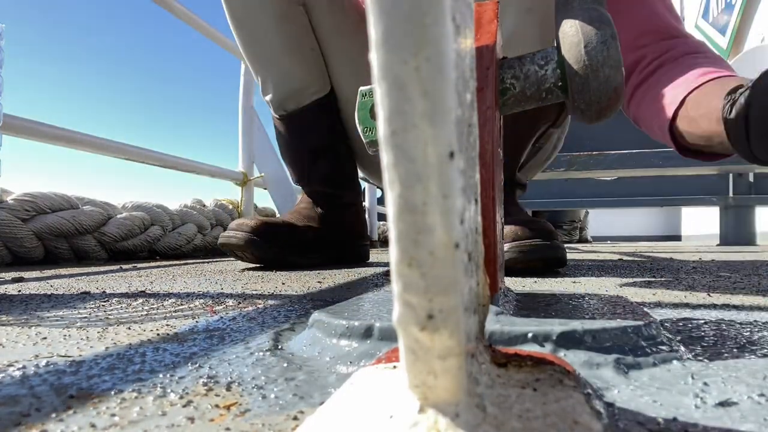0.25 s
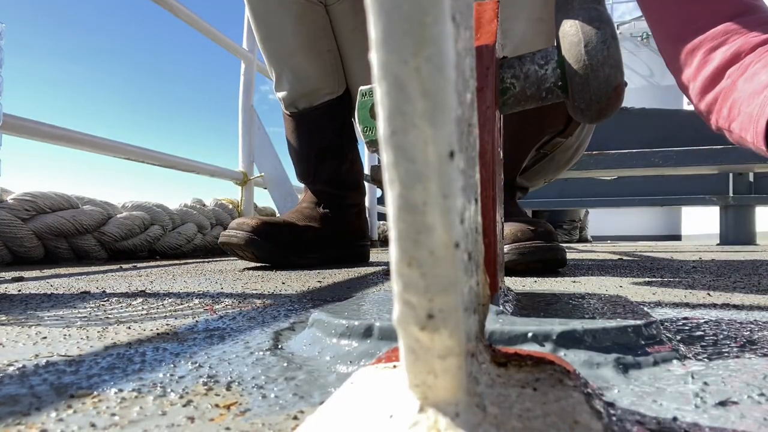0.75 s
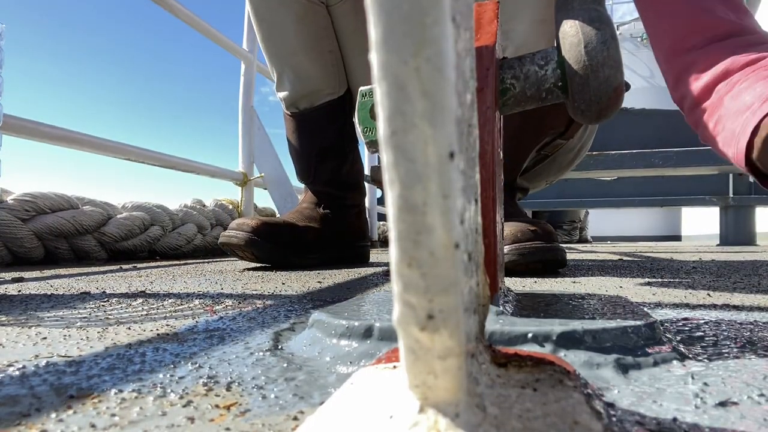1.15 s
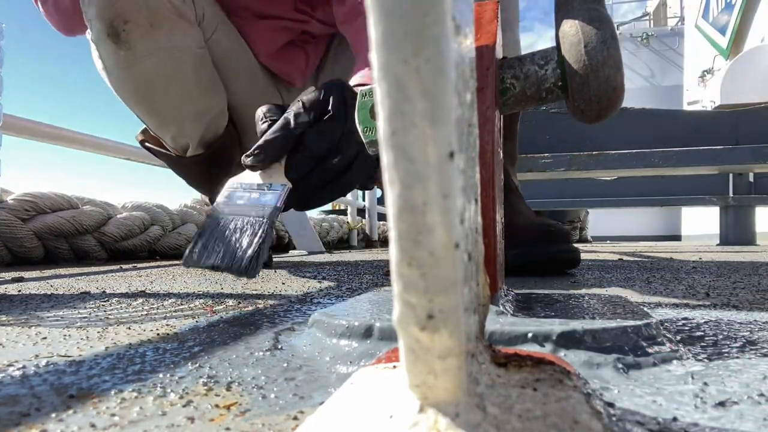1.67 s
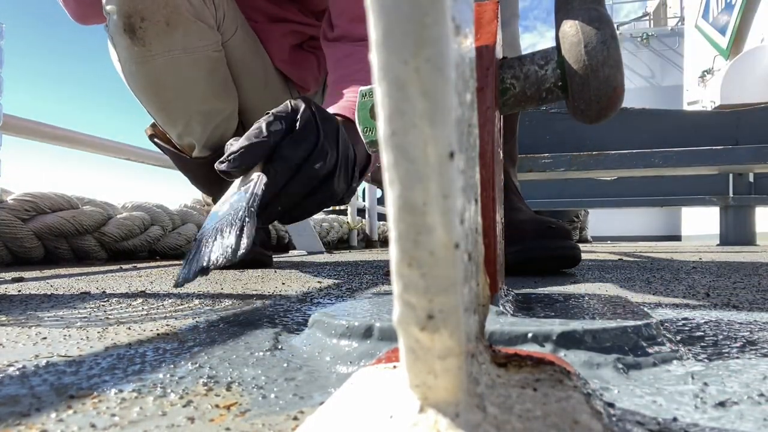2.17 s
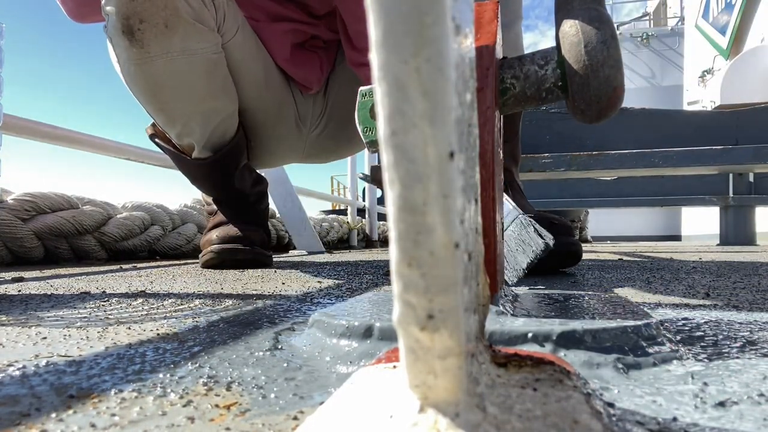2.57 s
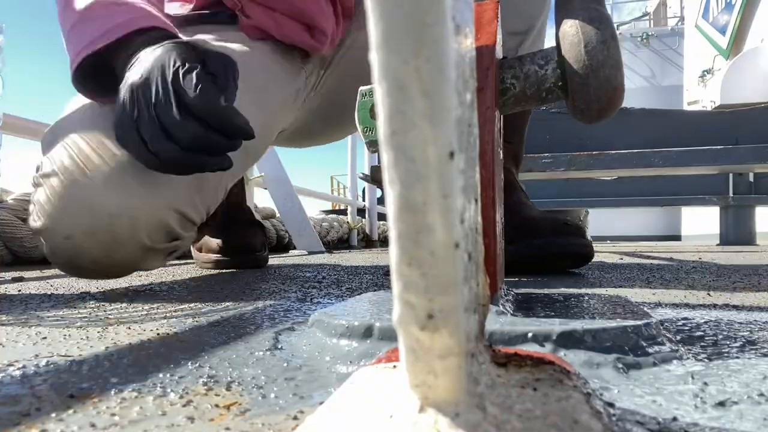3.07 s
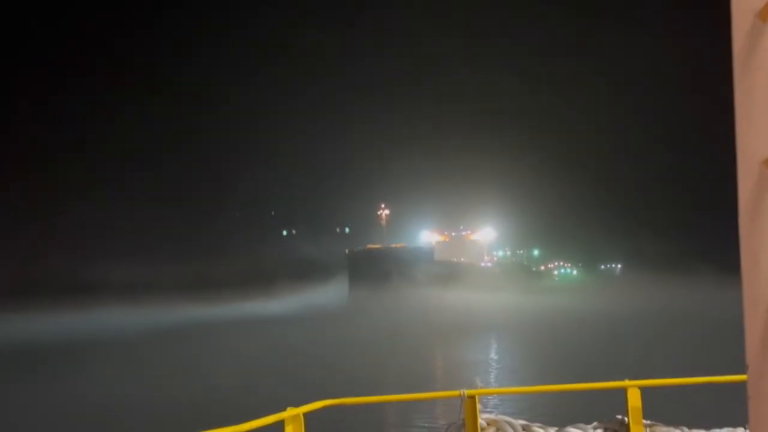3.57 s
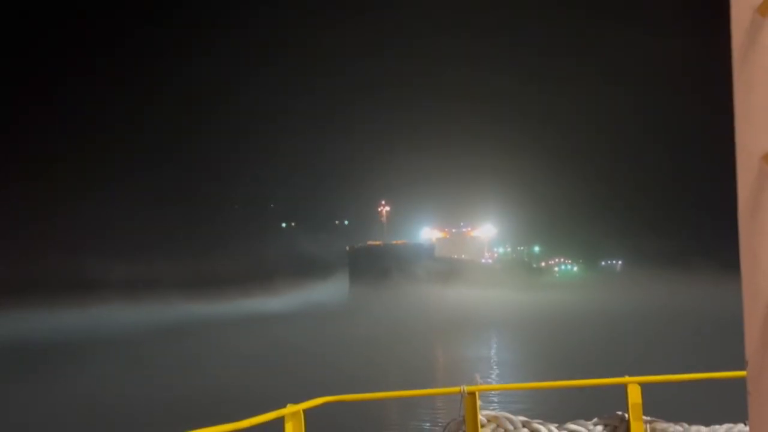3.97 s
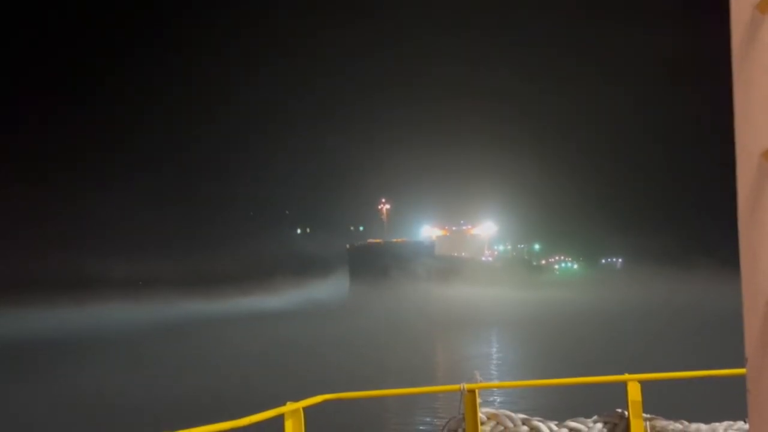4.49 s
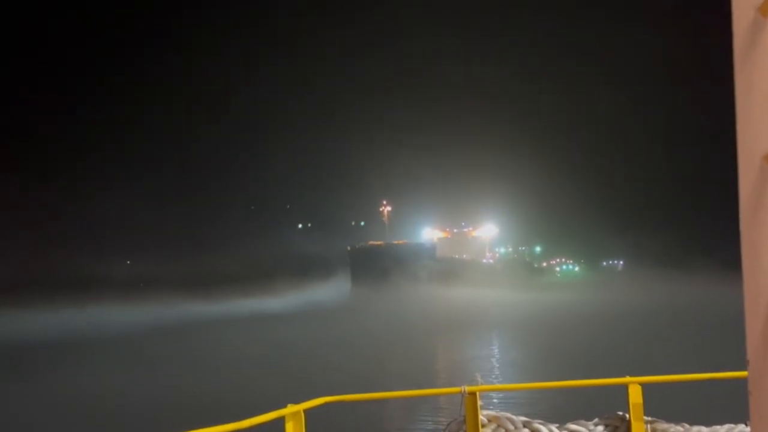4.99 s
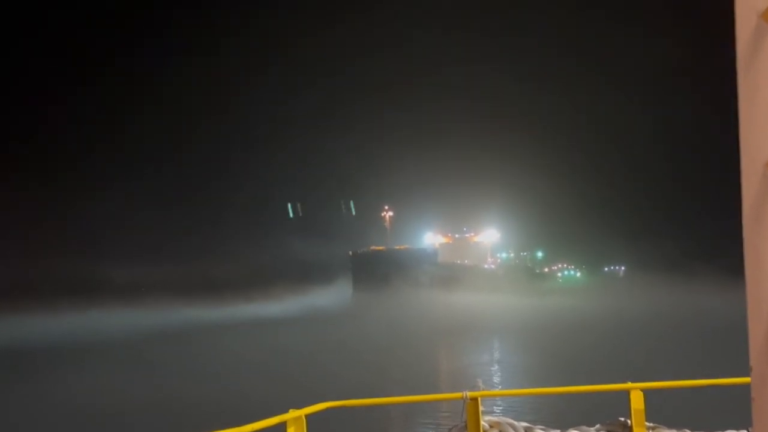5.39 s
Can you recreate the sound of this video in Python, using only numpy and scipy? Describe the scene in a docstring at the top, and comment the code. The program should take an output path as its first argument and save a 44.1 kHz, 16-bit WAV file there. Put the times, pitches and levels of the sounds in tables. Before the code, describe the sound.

A loud, steady rush of air and a constant mid-pitched motor hum come from a ventilation fan on a ship's deck, while wind knocks and crackles against the microphone. After about three seconds the sound switches abruptly to a calm river at night. There a faraway diesel engine drones, deep and gently pulsing, over a low rumble, far quieter than the fan.

```python
"""A ship's deck by day, then a quiet river at night. On deck a ventilation fan roars through its casing,
its motor sings on harmonics of the mains and its rotor whines. Wind buffets the two microphone ports,
and the hardest gusts make the gain control duck the machine. A hard cut leads to the river,
where a far diesel throbs over low rumble and a faint electrical whine."""
import sys
import numpy as np
from scipy import signal
from scipy.fft import rfft, irfft
from scipy.io import wavfile
from scipy.ndimage import uniform_filter1d

SR = 44100
rng = np.random.default_rng(int(sys.argv[2]) if len(sys.argv) > 2 else 0)


def dump_mix(stems):
    """Bounce the given channels to the path in sys.argv[1] as a 16-bit WAV at rate SR."""
    frames = np.atleast_2d(stems).T  # one column per channel
    limited = np.clip(frames, -1, 1)  # hard clip at full scale
    pcm = np.round(limited * 32767).astype(np.int16)
    wavfile.write(sys.argv[1], SR, pcm)


N = 248724
CUT_S = 3.2728   # from deck to river

# The rise and fall of the wind. Each row: time in seconds, strength in dB.
WIND_STRENGTH = [(0, -44.5), (.4, -45), (.75, -34.5), (1.0, -38.5), (1.4, -32), (1.8, -34), (2.0, -47),
                 (2.25, -34), (2.65, -39.5), (2.85, -32.5), (3.25, -39.5)]


def from_db(db):
    """Decibels to amplitude."""
    return 10 ** (np.asarray(db) / 20)


def bins_hz():
    """Frequencies of the spectrum bins, nudged off zero."""
    return np.arange(N // 2 + 1) * SR / N + 1e-3


def at_hz(rows, hz):
    """Every column of a spectrum table, read on a log-frequency axis."""
    row_hz, *columns = np.transpose(rows)
    return [np.interp(np.log(hz), np.log(row_hz), column) for column in columns]


def drift(rate_hz):
    """A random wander with a spread of 1, mostly slower than rate_hz."""
    hop, settle = 40, 2000
    pole = np.exp(-2 * np.pi * rate_hz * hop / SR)
    noise = rng.standard_normal(N // hop + settle + 2)
    slow = signal.lfilter([1], [1, -2 * pole, pole * pole], noise)[settle:]
    return np.interp(np.arange(N) / hop, np.arange(len(slow)), slow / slow.std())


def noise_field(spectrum, low_swell_db, high_swell_db, split_hz, swell_hz):
    """Stereo noise: a wave common to both ports plus a diffuse part; lows and highs swell separately."""
    db, pan_db, alike, lead = at_hz(spectrum, bins_hz())
    alike = np.clip(alike, 0, 1)
    common, left, right = rfft(rng.standard_normal((3, N)))
    ports = np.array([np.sqrt(alike) * common * np.exp(1j * lead) + np.sqrt(1 - alike) * left,
                      np.sqrt(alike) * common + np.sqrt(1 - alike) * right])
    ports *= np.sqrt(SR / 2) * from_db([db + pan_db / 2, db - pan_db / 2])
    lows = 1 / (1 + (bins_hz() / split_hz) ** 2)
    return (irfft(ports * lows, N) * from_db(low_swell_db * drift(swell_hz))
            + irfft(ports * (1 - lows), N) * from_db(high_swell_db * drift(swell_hz)))


def fan():
    """A broad roar of air, coloured by the casing; the hiss above 10 kHz slowly grows."""
    # The bare roar. Each row: frequency in Hz, level in dB per Hz, left minus right in dB,
    # share of power common to both ports, left phase lead in radians.
    airflow = [(60, -91, -0.5, 1, 0.5), (174, -89.5, -0.5, 0.99, -0.5), (377, -63.5, -1.5, 0.94, 0.5),
               (534, -54, -3.5, 0.98, 0.26), (834, -56, -2.5, 0.93, 0), (1376, -69.5, 0, 0.89, 0.5),
               (1940, -69, -3.5, 0.43, -1.0), (2520, -67, -5.5, 0.71, -0.5), (3870, -73, 1, 0.7, -1.5),
               (4620, -76, 0.5, 0.56, -2), (5290, -80.5, -2.5, 1, -4), (6490, -79.5, 4, 0.96, -3),
               (7030, -84, -1, 1, -3), (8330, -80.5, -1.2, 0.68, -3), (9670, -82.5, -4, 0.34, -2.5),
               (10000, -85, 0.5, 0.5, -2.5), (10170, -85, 0.5, 1, -3), (12200, -93.5, 0, 0.96, -3),
               (12600, -93, 0, .6, -4.5), (14000, -93.5, 1, .6, -2.5), (15500, -91.5, 0.5, .45, -4.5)]
    # The casing's humps and dips. Each row: centre in Hz, width in Hz, gain in dB.
    casing = [(1673, 40, 4), (2370, 75, 2.5), (2760, 140, -3.5), (3540, 160, 5.5), (6600, 790, 2),
              (14370, 350, 8.5), (15100, 300, -5)]
    casing_db = sum(db / (1 + (2 * (bins_hz() - hz) / width) ** 2) for hz, width, db in casing)
    air = noise_field(airflow, low_swell_db=0.25, high_swell_db=1.12, split_hz=1200, swell_hz=15.0)
    roar = rfft(air) * from_db(casing_db)
    hiss = irfft(roar / (1 + (10000 / bins_hz()) ** 6), N)
    lift_db = 0.7 + 1.3 * np.arange(N) / SR
    return irfft(roar, N) + (from_db(lift_db) - 1) * hiss


def motor_tones(rows, waver_db):
    """Sines of steady pitch and wavering level that reach the two ports out of step."""
    # Phase between the ports. Each row: frequency in Hz, left lead in radians.
    port_phase = [(700, -.14), (1100, -.06), (1800, -.1), (2600, -.9), (4400, -1.75), (5200, -3.1),
                  (8000, -3.2), (9100, -2.7), (10500, -3.1)]
    t = np.arange(round((CUT_S + .01) * SR)) / SR
    tones = np.zeros((2, N))
    swells = [from_db(waver_db * drift(5.1))[:len(t)] for _ in range(4)]
    for k, (hz, db, pan_db) in enumerate(rows):
        phase = 2 * np.pi * (hz * t + rng.random())
        lead = at_hz(port_phase, hz)[0]
        tones[0, :len(t)] += from_db(db + pan_db / 2) * np.sin(phase + lead) * swells[k % 4]
        tones[1, :len(t)] += from_db(db - pan_db / 2) * np.sin(phase) * swells[k % 4]
    return np.sqrt(2) * tones


def motor(pull_hz=119.905):
    """Magnetic pull hums at twice the mains frequency; the rotor adds its own, less steady whine."""
    # Magnetic hum. Each row: multiple of the pull rate, level in dB, left minus right in dB.
    harmonics = [(3.0, -45.1, -3.2), (6.0, -20.7, -3.7), (7.0, -38.0, -3.4), (8.0, -42.3, -3.6),
                 (9.0, -39.5, -2.7), (10.0, -44.7, -1.8), (11.0, -50.4, -3.5), (12.0, -45.0, -0.3),
                 (15.0, -51.2, 1.9), (16.0, -57, -2), (21.0, -54.2, -7.4), (24.0, -52.6, -0.4),
                 (27.0, -56.0, -3.2), (28.0, -60.1, 6.1), (29.0, -52.2, 0.7), (32.0, -60, 0),
                 (33.0, -59.0, 1.5), (36.0, -66.0, 4.0), (38.0, -65.0, 0.7), (46.0, -63, 0)]
    # Rotor and bearing whine. Each row: frequency in Hz, level in dB, left minus right in dB.
    whine = [(828.1, -35.3, -3.4), (1270.1, -52.9, -4.2), (1656.9, -56, -3), (2484.8, -52.0, -5.0),
             (2640.9, -48.9, -0.7), (2759.2, -54.0, -4.0), (2788.1, -51.3, -5.7), (2825.6, -51.8, 1.5),
             (2996.1, -55.4, -6.1), (4140.7, -56.3, 0.3), (4272.5, -52.8, 1.2), (4392.9, -52.4, -5.0),
             (5101.2, -63, 0), (5221.6, -63, 0), (6441.9, -64, 0), (6630.4, -61.9, -0.1),
             (7033.7, -61.9, -0.0), (7150.1, -63, 0), (7389.1, -64, 0), (7270.5, -49.7, 0.1),
             (7453.2, -56.5, -0.8), (7571.5, -61.7, -2.1), (8282.0, -55.4, -2), (8430.3, -62.5, -1),
             (9109.7, -60.3, -2.7), (10770, -65, 0), (10890, -66.5, 0)]
    hum = [(multiple * pull_hz, db, pan_db) for multiple, db, pan_db in harmonics]
    return motor_tones(hum, waver_db=0.76) + motor_tones(whine, waver_db=1.0)


def small_buffets(count):
    """Lesser buffets at random times, sized by the wind; same columns as the strong ones."""
    over_wind_db, edge_offset_db, pop_offset_db, spread_db = 4, -9, -25.5, 2.5
    times = rng.uniform(.06, CUT_S, count)
    scatter_db = spread_db * rng.uniform(-np.sqrt(3), np.sqrt(3), (count, 4)).T
    body_db = np.interp(times, *np.transpose(WIND_STRENGTH)) + over_wind_db + scatter_db[0]
    edge_db = body_db + edge_offset_db + scatter_db[1]
    pop_db = body_db + pop_offset_db + scatter_db[2]
    return np.transpose([times, body_db, edge_db, pop_db, 2 * scatter_db[3]])


def bursts(times, levels_db, pans_db, fall_s):
    """A stereo envelope of sharp peaks, each rising about as fast as it falls."""
    t, envelope = np.arange(N) / SR, np.zeros((2, N))
    for peak_s, db, pan_db in zip(times, levels_db, pans_db):
        near = slice(round((peak_s - .05) * SR), round((peak_s + .08) * SR))
        age = (t[near] - peak_s) / fall_s
        shape = np.exp(np.where(age < 0, age / 1.05, -age))
        envelope[:, near] += from_db([[db + pan_db / 2], [db - pan_db / 2]]) * shape
    return envelope


def coloured(sound, colour):
    """The sound through an EQ curve scaled to an rms gain of 1."""
    gain = from_db(at_hz(colour, bins_hz())[0])
    return irfft(rfft(sound) * gain / np.sqrt(np.mean(gain ** 2)), N)


def eddies(envelope, colour, alike):
    """Turbulent noise under an envelope; alike is the share of power common to both ports."""
    common, *own = rng.standard_normal((3, N))
    noise = np.sqrt(alike) * common + np.sqrt(1 - alike) * np.array(own)
    return coloured(envelope * noise, colour)


def pressure_jumps(times, levels_db, pans_db, fall_s, colour):
    """One coloured impulse per buffet, as strong as a burst of that fall time."""
    clicks = np.zeros((2, N))
    levels = from_db([levels_db + pans_db / 2, levels_db - pans_db / 2])
    clicks[:, (times * SR).astype(int)] = levels * np.sqrt(fall_s * SR)
    return coloured(clicks, colour)


def wind():
    """Wind on the ports: a lumpy bed, and buffets made of a body, a brighter edge and a deep pop."""
    # The strongest buffets. Each row: time in seconds, body in dB before its rush and thump trims,
    # edge in dB, pop in dB, left minus right in dB.
    strong_buffets = [(0.412, -27, -40.5, -51, 1), (0.672, -25, -36, -51, -7),
                      (0.712, -27.5, -34, -58.5, 2), (0.948, -26.5, -39.5, -49, -4.5),
                      (1.19, -22.5, -36, -65, -4), (1.344, -16.5, -24.5, -41, -1),
                      (1.445, -23, -27.5, -41.5, 0), (1.46, -22, -29, -53, -1), (1.476, -20, -30.5, -57, 0),
                      (1.519, -27.5, -35, -48.5, -1.5), (1.562, -25, -36, -52.5, -5.5),
                      (1.668, -20.5, -36, -43.5, -8), (1.69, -20.5, -22.5, -53.5, -6.5),
                      (1.787, -25, -30.5, -49.5, -2), (1.863, -22, -23, -53, 3.5),
                      (1.884, -21.5, -35.5, -58, -0.5), (2.193, -21, -32.5, -56.5, -1.5),
                      (2.223, -23, -27, -53.5, -2.5), (2.287, -22, -34.5, -60, -1),
                      (2.43, -23.5, -33, -58, -2), (2.556, -21.5, -28, -60, -5), (2.583, -19, -33, -58, -1),
                      (2.688, -28.5, -36, -50.5, 0), (2.75, -23.5, -27, -50, -4),
                      (2.765, -24, -33, -51.5, -0.5), (2.797, -24, -28, -49, -4.5),
                      (2.811, -21.5, -29, -54, -1), (2.828, -22, -29, -49.5, -2),
                      (2.9, -20.5, -27, -51.5, 0), (2.96, -27.5, -36, -51.5, -2),
                      (3.006, -22.5, -36, -61, -2), (3.148, -26.5, -33.5, -52.5, -5.5),
                      (3.255, -25.5, -37, -49, 0)]
    # Three wind colours behind the microphone's wind filter. Each row: frequency in Hz, relative dB.
    body_colour = [(30, -60), (150, -34), (250, -12), (400, 0), (600, 3.5), (1200, -13), (2500, -35),
                   (5000, -51.5), (9000, -83)]
    edge_colour = [(250, -63.5), (500, -18), (900, 3.5), (1500, 0), (2500, -7), (3500, -12), (5500, -27),
                   (9000, -59)]
    pop_colour = [(25, -1), (90, -3), (200, 3.5), (500, -21), (1000, -69)]
    body_fall_s, edge_fall_s, pop_fall_s, pop_lead_s = 0.0065, 0.0033, 0.0029, 0.003
    rush_trim_db, thump_trim_db = -2, -5   # the body is a rush of noise around one thump
    strength_db = np.interp(np.arange(N) / SR, *np.transpose(WIND_STRENGTH))
    lumps_db = 2.6 * np.array([drift(22), drift(24)])
    times, body_db, edge_db, pop_db, pan_db = np.vstack([strong_buffets, small_buffets(count=30)]).T
    bed = eddies(from_db(strength_db + lumps_db), body_colour, alike=0.55)
    rush = eddies(bursts(times, body_db + rush_trim_db, pan_db, body_fall_s), body_colour, alike=0.18)
    edge = eddies(bursts(times, edge_db, pan_db, edge_fall_s), edge_colour, alike=0.18)
    thump = pressure_jumps(times, body_db + thump_trim_db, pan_db, body_fall_s, body_colour)
    pop = pressure_jumps(times - pop_lead_s, pop_db, pan_db, pop_fall_s, pop_colour)
    return bed + rush + edge + thump + pop


def ducked(machine, gusts, half_power_db=-21, smooth_s=0.008):
    """Strong wind at the ports makes the gain control turn the machine down for a moment."""
    wind_power = uniform_filter1d(np.mean(gusts ** 2, axis=0), round(smooth_s * SR))
    return machine / np.sqrt(1 + (wind_power / from_db(half_power_db) ** 2) ** 2)


def treble_shift(machine, at_s=1.5, fade_s=0.087):
    """The treble in the centre of the image changes colour; the sides stay as they are."""
    # The centre's EQ. Each row: frequency in Hz, gain in dB after the shift (the opposite before it).
    treble_eq = [(5600, 0), (6200, -5), (7000, -5.5), (7600, -1), (9000, 1.5), (12000, -3), (13000, 0.5),
                 (14400, 3), (15300, 0)]
    centre = machine.mean(axis=0)
    eq_db = at_hz(treble_eq, bins_hz())[0]
    before, after = irfft(rfft(centre) * from_db([-eq_db, eq_db]), N)
    blend = np.clip((np.arange(N) / SR - at_s) / fade_s + .5, 0, 1)
    return machine - centre + (1 - blend) * before + blend * after


def night_rumble():
    """Low, gently swelling night rumble, with a very faint steady noise floor in the treble."""
    # Each row: frequency in Hz, level in dB per Hz, left minus right in dB,
    # share of power common to both ports, left phase lead in radians.
    rumble_and_noise_floor = [(20.0, -70, -0.5, 1, 0), (43.0, -59.7, -0.5, 1.0, 0),
                              (69, -56.5, -1.5, 1, -0.1), (90, -59.5, -1.2, 1, 0.1),
                              (119, -60, -1, 1, 0.48), (200, -74, -1, 0.9, -0.78),
                              (340, -77.5, -0.2, 0.83, -0.084), (550.0, -82, 0, 0.5, 1.04),
                              (920, -85.5, -2, 0.54, 1.3), (1500.0, -92.5, -4, 0.03, 0.3),
                              (2350, -97.5, -1.5, 0.8, 0.1), (3260, -103.1, -0.7, 1, 0.1),
                              (4950, -119.3, 0.0, 0.94, -0.0), (5700, -124.5, 0, .92, 0),
                              (7400, -129, 0, 0.95, 0), (8800, -131, 0, .5, -1.8),
                              (9300, -132, -1, .5, -1.8), (9600, -130, -1, .6, -.1), (9950, -133, 0, .8, 3),
                              (10300, -133.5, 0, .75, 3), (11200, -133.5, 0, .36, 1.6),
                              (12000, -134, 0, .9, 0), (13600, -134, 0, .9, 0), (13800, -144, 0, .1, 0)]
    return noise_field(rumble_and_noise_floor, low_swell_db=1.4, high_swell_db=0.07,
                       split_hz=140, swell_hz=3.1)


def diesel(firing_hz=89.8):
    """A far engine's firing orders, wavering a little on their way over the water."""
    # The close orders beat into a throb. Each row: multiple of the firing rate, level in dB.
    orders = [(0.9, -50.5), (1, -36), (1.106, -53.5), (2, -59), (4, -64.5)]
    phase = 2 * np.pi * firing_hz * np.arange(N) / SR
    drone = sum(from_db(db) * np.sin(multiple * phase) for multiple, db in orders)
    pan = from_db([[-.6], [.6]])   # just right of centre
    return np.sqrt(2) * from_db(0.9 * drift(2.9)) * drone * pan


def electrical_whine():
    """Faint, thin tones, wavering in level and alike at both ports."""
    # Each row: frequency in Hz, level in dB.
    partials = [(3836, -94), (9500, -105.5), (9680, -106), (13314, -113.5), (13674, -116)]
    t = np.arange(N) / SR
    whine = sum(from_db(db) * np.sin(2 * np.pi * (hz * t + rng.random())) for hz, db in partials)
    return np.sqrt(2) * from_db(1.5 * drift(6)) * whine


def scene():
    """The deck stops dead at the cut; the river fades in over a few milliseconds."""
    t = np.arange(N) / SR
    machine = treble_shift(fan() + motor())
    gusts = wind()
    deck = ducked(machine, gusts) + gusts
    river = night_rumble() + diesel() + electrical_whine()
    return deck * np.clip((CUT_S - t) / 0.00025, 0, 1) + river * np.clip((t - CUT_S) / 0.0036, 0, 1)


def record(dry):
    """A low cut trims the deepest rumble and a steep high cut takes off the very top."""
    low_cut_hz, high_cut_hz = 28, 15770
    low_cut = signal.butter(4, low_cut_hz, "high", fs=SR, output="sos")
    high_cut = signal.ellip(14, .3, 70, high_cut_hz, fs=SR, output="sos")
    return signal.sosfilt(high_cut, signal.sosfilt(low_cut, dry))


dry = scene()
out = record(dry)
dump_mix(out)
```